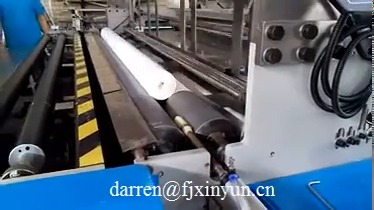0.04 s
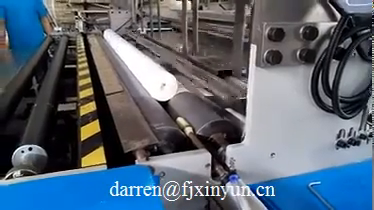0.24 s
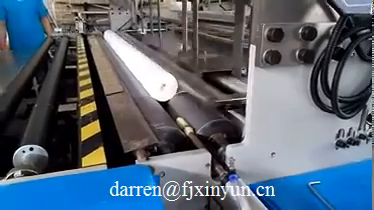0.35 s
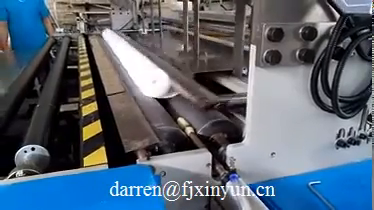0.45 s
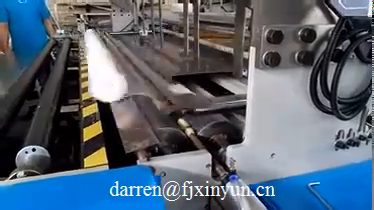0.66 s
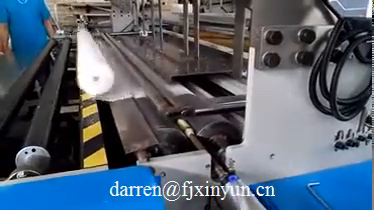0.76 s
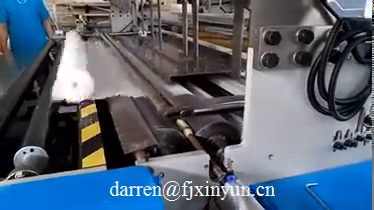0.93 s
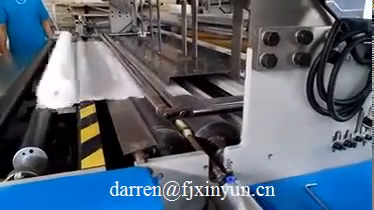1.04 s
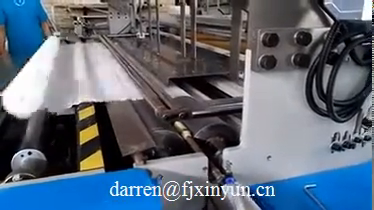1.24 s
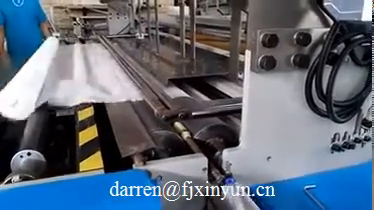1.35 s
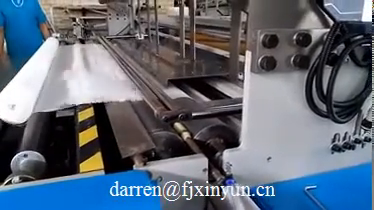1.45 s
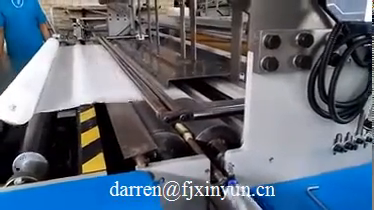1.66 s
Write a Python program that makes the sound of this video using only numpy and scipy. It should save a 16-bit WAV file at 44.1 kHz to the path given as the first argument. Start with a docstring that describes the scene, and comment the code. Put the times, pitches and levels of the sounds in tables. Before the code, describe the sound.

A steel machine plate rattles along its stroke and slams ringing into its stop in a factory hall

```python
"""A paper converting machine in a factory hall, right of a phone: its steel pusher plate rattles along
its stroke (gated noise over ringing guides), slams into its stop and bounces (bursts, sines, ringing modes).
Valves and links clunk before it as cracks, bursts and thuds; air hisses and the frame rumbles as coloured
noise; short noise bursts make scrapes and knocks of the pusher, then chain ticks.
The hall hums as dark noise of wavering level and rings as a decaying echo."""
import sys
import numpy as np
from scipy import signal
from scipy.fft import rfft, irfft, next_fast_len
from scipy.io import wavfile
from scipy.ndimage import uniform_filter1d, map_coordinates

SR = 44100
rng = np.random.default_rng(int(sys.argv[2]) if len(sys.argv) > 2 else 0)


def gain_from_decibels(decibels):
    """Convert decibel values to linear amplitude factors."""
    exponent = np.asarray(decibels, float) / 20
    return 10 ** exponent


def int16_out(signal):
    """Quantize to a 16-bit WAV file."""
    q = np.round(np.clip(np.atleast_2d(signal).T, -1, 1) * 32767)
    wavfile.write(sys.argv[1], SR, q.astype(np.int16))


N = 74970  # length in samples


def unit(x):
    """Scales x to rms 1."""
    return x / np.sqrt(np.mean(x ** 2) + 1e-20)


def along(points, hz):
    """Reads (Hz, value) points on a log frequency axis."""
    f, v = np.transpose(points)
    return np.interp(np.log(hz + 1), np.log(f + 1), v)


def curves(rows):
    """One value per sample for each column after the time; -120 dB outside the table."""
    s, *columns = np.transpose(rows)
    return [np.interp(np.arange(N) / SR, s, column, left=-120, right=-120) for column in columns]


def wobble(rate):
    """A smooth random curve with rate knots a second."""
    knots = rng.standard_normal(int(N * rate / SR) + 4)
    return map_coordinates(knots, [np.arange(N) * rate / SR])


def filtered(x, response):
    """Filters x by a complex response of frequency."""
    size = next_fast_len(x.shape[-1] + SR)
    spectrum = rfft(x, size) * response(np.fft.rfftfreq(size, 1 / SR))
    return irfft(spectrum, size)[..., :x.shape[-1]]


def noise(colour, size=N, gate=1):
    """Coloured noise of rms 1, gated before its colour."""
    white = gate * rng.standard_normal(size)
    return unit(filtered(white, lambda hz: gain_from_decibels(along(colour, hz))))


def blend(pair, alike):
    """Turns two unrelated signals into a left and right of a given likeness at each frequency."""
    def mid_side_gains(hz):
        angle = np.arccos(np.clip(along(alike, hz), -1, 1)) / 2
        return np.array([np.cos(angle), np.sin(angle)])

    mid, side = filtered(pair, mid_side_gains)
    return np.array([mid + side, mid - side])


def ring(x, modes):
    """x excites exponentially decaying sine modes through a slightly soft contact."""
    t = np.arange(SR) / SR
    body = sum(gain_from_decibels(db - 60 * t / t60) * np.sin(2 * np.pi * hz * t) for hz, db, t60 in modes)
    soft = np.convolve(body, np.hanning(8))
    return signal.fftconvolve(x, soft / np.abs(soft).max())[:N]


def add(track, s, sound):
    """Puts a sound on a track at s seconds."""
    part = track[round(s * SR):][:len(sound)]
    part += sound[:len(part)]


def burst(colour, db, t60, attack_s):
    """A burst of coloured noise with a quick onset and an exponential decay."""
    t = np.arange(SR // 2) / SR
    onset = 1 - np.exp(-(t / attack_s) ** 2)
    return gain_from_decibels(db - 60 * t / t60) * onset * noise(colour, size=len(t))


# Fader of the air hiss. Each row: time in seconds, level in dB.
AIR_LEVEL = [(0, -39.5), (.08, -50), (.19, -71), (.203, -41), (.7, -41), (.74, -60)]
# Colour of the air hiss. Each row: frequency in Hz, level in dB per Hz.
AIR_COLOUR = [(600, 1), (2300, 8.5), (10500, -9), (15500, -20)]
# How diffuse the hall sounds. Each row: frequency in Hz, left-right likeness (1 = the same, no unit).
HALL_ALIKE = [(100, 0.9), (500, 0.97), (1500, 0.066), (5000, 0)]


def air():
    """Compressed air hisses while the cylinder works: wide turbulent noise with a flutter."""
    db, = curves(AIR_LEVEL)
    hiss = blend(np.array([noise(AIR_COLOUR), noise(AIR_COLOUR)]), HALL_ALIKE)
    return gain_from_decibels(db + 1.2 * wobble(24.8)) * hiss


# Colour of the hall's hum. Each row: frequency in Hz, level in dB per Hz.
HUM_COLOUR = [(25, -36), (70, -9), (200, -4), (400, -9), (860, -12.5), (1240, -26), (2800, -27),
              (10700, -51), (15000, -74)]


def hum():
    """Far machines fill the hall: wide, dark noise whose level wavers."""
    hum_db, waver_db = -38, 4.5
    bed = blend(np.array([noise(HUM_COLOUR), noise(HUM_COLOUR)]), HALL_ALIKE)
    return gain_from_decibels(hum_db + waver_db * wobble(13.81)) * bed


# Fader of the frame's rumble. Each row: time in seconds, level in dB.
FRAME_LEVEL = [(.195, -62), (.225, -26.5), (.3, -28.5), (.45, -35), (.57, -34.5), (.66, -28.5), (.7, -34),
               (.8, -40), (.87, -36), (1.12, -33), (1.24, -43)]
# Colour of the frame's rumble. Each row: frequency in Hz, level in dB per Hz.
FRAME_COLOUR = [(30, -18), (70, 7.5), (220, -9), (500, -6), (900, -45)]


def frame():
    """The heavy frame rumbles in lumps: low noise with an uneven level."""
    db, = curves(FRAME_LEVEL)
    return gain_from_decibels(db + 1.8 * wobble(37.97)) * noise(FRAME_COLOUR)


# Clunks of valves and links. Each row: start in seconds, level in dB, thud level in dB over the clunk,
# thud pitch in Hz, crack pitch in Hz.
CLUNKS = [(0.2037, -21, -22, 77, 1488), (0.2271, -16.5, -5.5, 209.4, 473), (.3845, -19.5, -11, 81.6, 1155),
          (.484, -29.5, 1, 159, 466), (0.602, -34, 11.5, 224.4, 500), (.828, -33.5, 18.5, 215.2, 500)]
# Ringing modes of the links. Each row: frequency in Hz, level in dB, t60 in seconds.
LINK_MODES = [(455, 0, .15), (1100, -5, .06), (2260, -4, .14), (3070, -9, .08)]
# Colour of a clunk's burst. Each row: frequency in Hz, level in dB per Hz.
LINK_COLOUR = [(90, -3), (200, 2.5), (1100, -2), (2300, -8), (4000, -19), (15000, -56)]


def links():
    """Each clunk is a crack, a burst, the ringing links and a low thud of the frame."""
    burst_t60_s, thud_t60_s = 0.16, 0.13
    crack_db, crack_t60_s = 7.5, 0.014  # the crack's level is over the clunk's
    ring_db = -1  # strength of the blow on the modes, relative to the clunk
    out, blows = np.zeros(N), np.zeros(N)
    t = np.arange(SR // 2) / SR
    for s, db, thud_db, thud_hz, crack_hz in CLUNKS:
        add(out, s, burst(LINK_COLOUR, db, burst_t60_s, attack_s=0.00072))
        crack = np.sin(2 * np.pi * crack_hz * t)
        add(out, s, gain_from_decibels(db + crack_db - 60 * t / crack_t60_s) * crack)
        thud = (1 - np.exp(-t / 0.015)) * np.sin(2 * np.pi * thud_hz * t)
        add(out, s, gain_from_decibels(db + thud_db - 60 * t / thud_t60_s) * thud)
        add(blows, s, gain_from_decibels([db + ring_db]))
    return out + ring(blows, LINK_MODES)


# Short scrapes and knocks of the pusher, then chain ticks. Each row: start in seconds, level in dB.
SMALL_KNOCKS = [(0.5071, -34), (0.5793, -41), (.6404, -34.5), (0.708, -29.5), (.7195, -33.5), (1.161, -34),
                (1.246, -38.5), (1.3231, -41.5), (1.552, -42.5), (1.6403, -43)]
# Colour of these short sounds. Each row: frequency in Hz, level in dB per Hz.
SMALL_KNOCK_COLOUR = [(800, -6.5), (2800, 2.5), (9000, -20), (12000, -33)]


def pusher_knocks_and_chain():
    """Short noise bursts: scrapes and knocks as the pusher travels, then chain ticks as the log rolls out."""
    out = np.zeros(N)
    for s, db in SMALL_KNOCKS:
        add(out, s, burst(SMALL_KNOCK_COLOUR, db, t60=0.055, attack_s=0.00047))
    return out


# Rattle along the stroke. Each row: time in seconds, low rattle in dB, bright rattle in dB.
STROKE = [(.512, -58, -35.5), (.7, -35.5, -52), (.71, -41, -25), (.728, -20.5, -20), (.77, -26, -30),
          (.82, -21.5, -30.5), (.87, -58, -63), (.895, -48, -28)]
# Colour of the low rattle. Each row: frequency in Hz, level in dB per Hz.
RATTLE_LOW = [(200, -21), (500, -1), (900, -1), (1150, 1.5), (1400, -48)]
# Colour of the bright rattle. Each row: frequency in Hz, level in dB per Hz.
RATTLE_BRIGHT = [(1000, -19.5), (1500, 3), (2000, -2.5), (2600, -0.5), (4000, -14), (8500, -33),
                 (11000, -75)]
# Ringing modes of the guide rails. Each row: frequency in Hz, level in dB, t60 in seconds.
GUIDE_MODES = [(565, -10, .15), (690, -10, .12), (834, 0, .3), (1556, -10, .12), (2691, -14, .2)]
# Ringing modes of the plate. Each row: frequency in Hz, level in dB, t60 in seconds.
PLATE_MODES = [(370, -5, .15), (503, -9, .25), (785, -12, .5), (872, -8, .35), (961, -9, .55),
               (989, -8, .5), (1029, -4, .7), (1820, -12, .6), (2068, -9, 1.2), (2445, -10, .6)]
# Colour of the slam's burst. Each row: frequency in Hz, level in dB per Hz.
SLAM_COLOUR = [(150, -86), (350, -7), (1000, -9.5), (1250, -14), (2500, -29.5), (4500, -32), (8500, -36.5),
               (12000, -78)]
# Colour of the loose parts' jangle. Each row: frequency in Hz, level in dB per Hz.
JANGLE_COLOUR = [(1100, 2.5), (2200, 3), (4600, -12.5), (8000, -33), (11000, -40)]
# The knock of the stop and its bounces. Each row: start in seconds, level in dB.
BOUNCES = [(0.8978, -8.5), (.968, -2.5), (1.041, -9.5)]


def plate():
    """Rattling grains ring the guides; the slam and bounces follow, damped at rest: clatter and ring."""
    grains_per_s, grain_spread_db, guide_ring_db = 3400, 3, -25
    low_db, bright_db = curves(STROKE)
    hits = rng.random(N) < grains_per_s / SR
    grains = hits * rng.standard_normal(N) * gain_from_decibels(grain_spread_db * rng.standard_normal(N))
    rough = unit(uniform_filter1d(np.abs(grains), size=90))
    clatter = gain_from_decibels(low_db) * noise(RATTLE_LOW, gate=rough)
    clatter += gain_from_decibels(bright_db) * noise(RATTLE_BRIGHT, gate=rough)
    guide_ring = ring(gain_from_decibels(low_db + guide_ring_db) * unit(grains), GUIDE_MODES)

    slam_s = 0.8965
    blows, jangle = np.zeros((2, N))
    add(clatter, slam_s, burst(SLAM_COLOUR, db=-10, t60=0.05, attack_s=0.00028))
    add(jangle, slam_s, burst(JANGLE_COLOUR, db=-22, t60=0.61, attack_s=0.00021))
    add(blows, slam_s, gain_from_decibels([-4]))

    bounce_hz, bounce_width_hz, bounce_t60_s = 995, 86, 0.07
    t = np.arange(SR // 8) / SR
    pitches_hz = bounce_hz + bounce_width_hz * np.array([[-.5], [0], [.5]])
    knock = np.sin(2 * np.pi * pitches_hz * t).mean(axis=0)
    knock *= 1 - np.exp(-(t / 0.0012) ** 2)
    for s, db in BOUNCES:
        add(clatter, s, gain_from_decibels(db - 60 * t / bounce_t60_s) * knock)

    # the plate settles on its stop and is damped
    rests_s, rest_db_per_s = 1.17, 220
    rest = gain_from_decibels(-rest_db_per_s * np.clip(np.arange(N) / SR - rests_s, 0, None))
    return clatter + rest * jangle, rest * ring(blows, PLATE_MODES) + guide_ring


# Decay of the hall. Each row: frequency in Hz, t60 in seconds.
HALL_T60 = [(100, 1.73), (1000, 0.99), (6000, 0.56), (12000, 0.62)]


def hall(x, share=1):
    """A noise tail in which each frequency dies at its own speed; share scales the t60."""
    hz, t, bins = signal.stft(rng.standard_normal((2, 3 * SR // 2)), SR, nperseg=128)
    decay = gain_from_decibels(-60 * t / (share * along(HALL_T60, hz)[:, None]))
    tail = signal.istft(bins * decay, SR, nperseg=128)[1]
    late = np.pad(x, (60, 0))[None]  # delayed by 60 samples
    wet = signal.fftconvolve(late, tail / np.linalg.norm(tail[0]), axes=1)[:, :N]
    return blend(wet, HALL_ALIKE)


def scene():
    """The machine, its near walls, the hall's echo and hum."""
    small = links() + pusher_knocks_and_chain()
    clatter, steel = plate()
    echo = hall(gain_from_decibels(-5.5) * small + gain_from_decibels(0.5) * clatter + gain_from_decibels(-14) * steel)
    machine = small + clatter + steel
    near_walls = gain_from_decibels(-1.5) * hall(machine, share=0.047)
    return machine + near_walls + echo + frame() + air() + hum()


def top_cut(x):
    """Nothing passes above the cut-off."""
    return signal.sosfilt(signal.butter(12, 15610, fs=SR, output="sos"), x)


# The phone shades its left port. Each row: frequency in Hz, left minus right in dB.
SHADOW = [(100, 0.6), (700, 0.4), (1700, -2), (5000, -7), (15000, -18.5)]


def record(dry):
    """Two microphone ports deaf to deep bass, the left one shaded and late."""
    left_late_s, low_cut_hz = 0.00022, 30.4

    def ports(hz):
        half_db = along(SHADOW, hz) / 2
        left = gain_from_decibels(half_db) * np.exp(-2j * np.pi * hz * left_late_s)
        low_cut = (1j * hz / (low_cut_hz + 1j * hz)) ** 2
        return np.array([left, gain_from_decibels(-half_db)]) * low_cut

    return top_cut(filtered(dry, ports))


dry = scene()
out = record(dry)
int16_out(out)
```